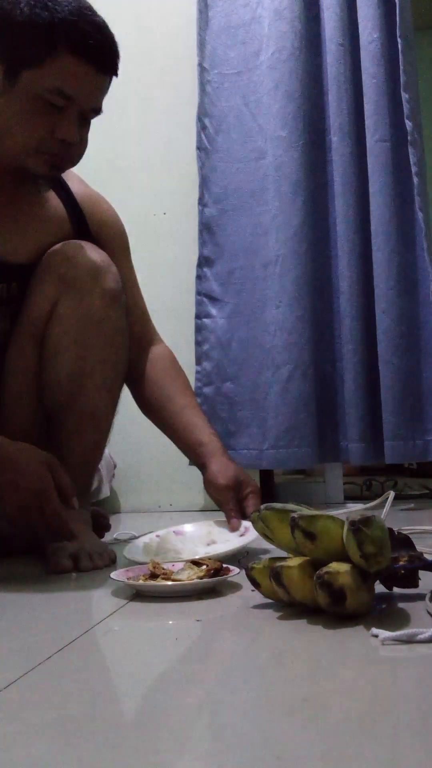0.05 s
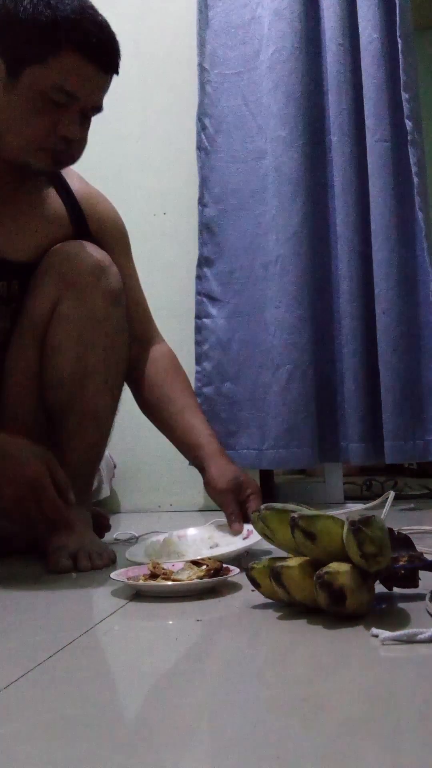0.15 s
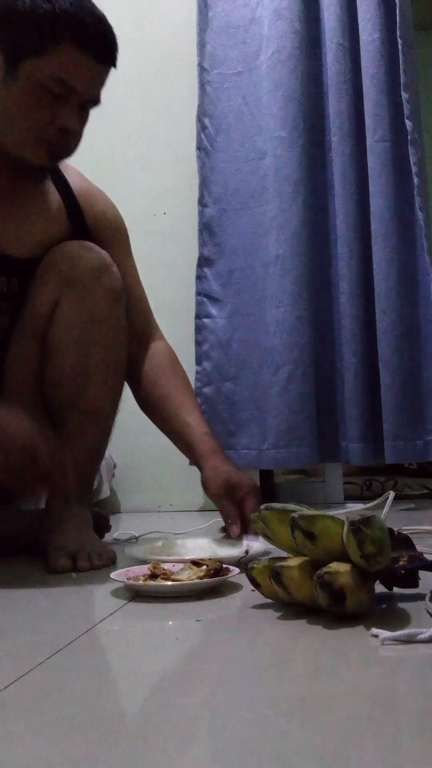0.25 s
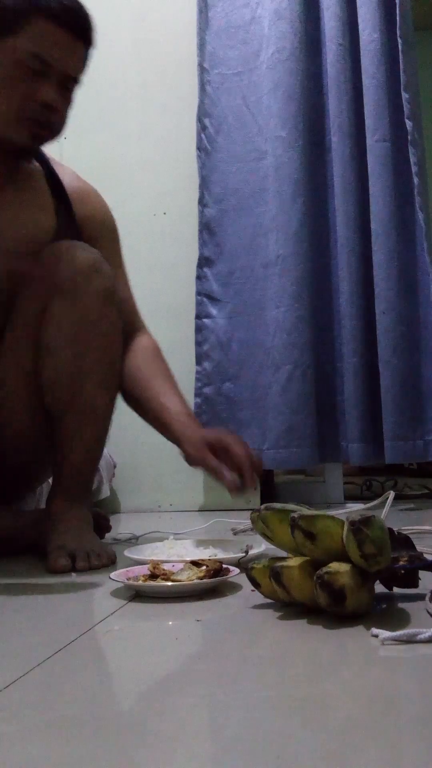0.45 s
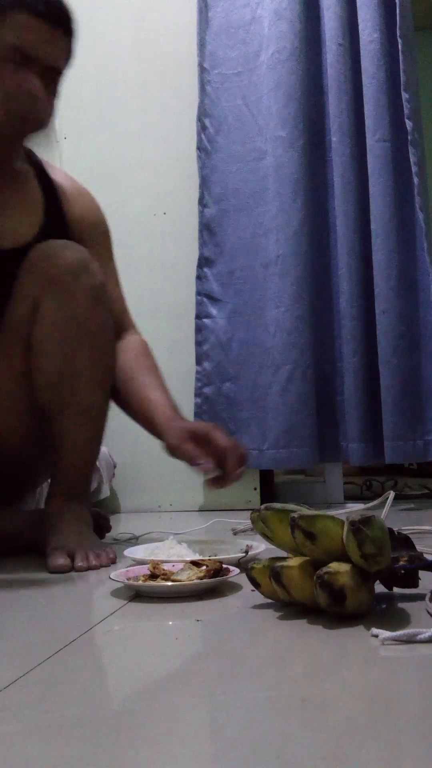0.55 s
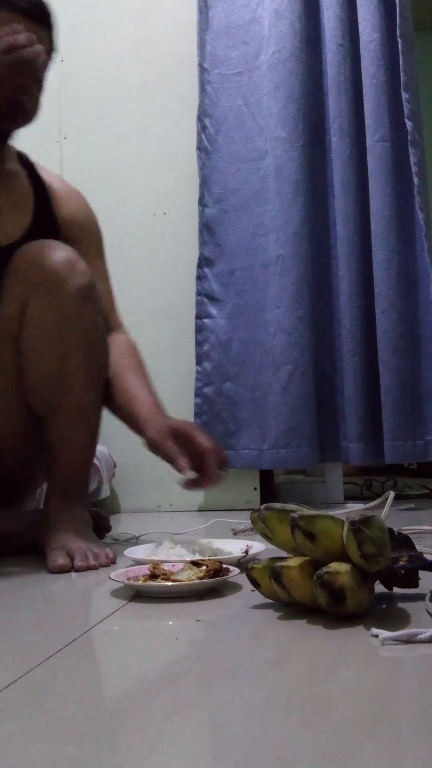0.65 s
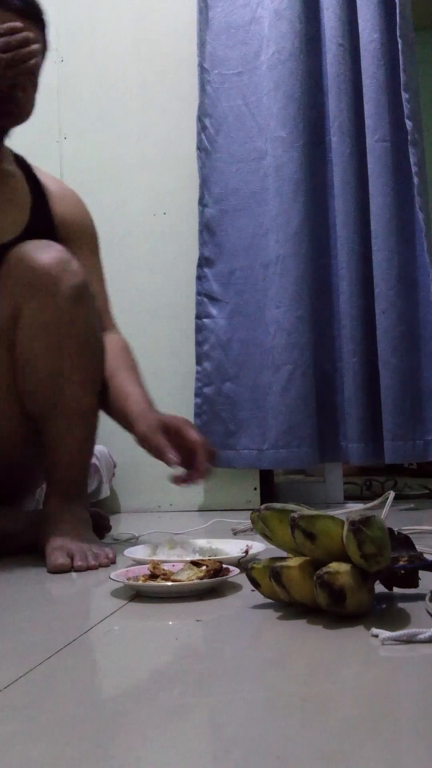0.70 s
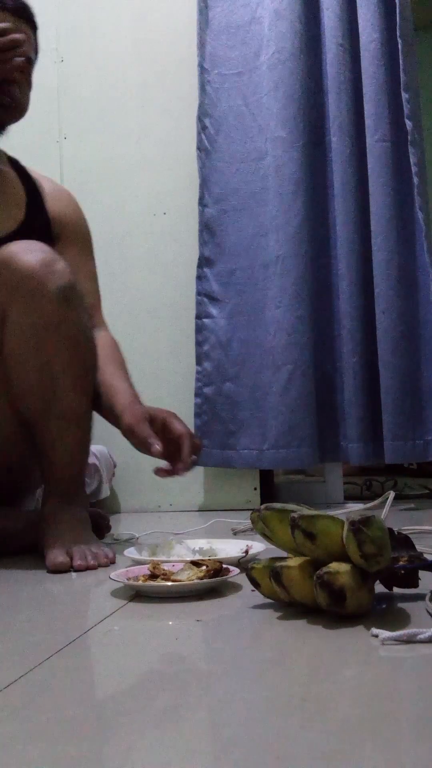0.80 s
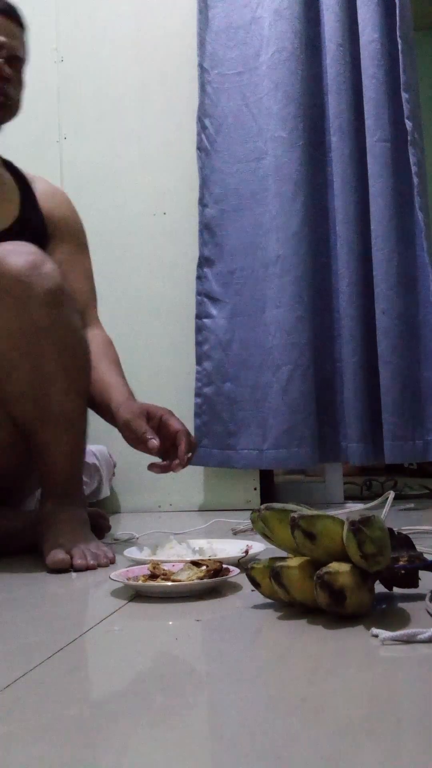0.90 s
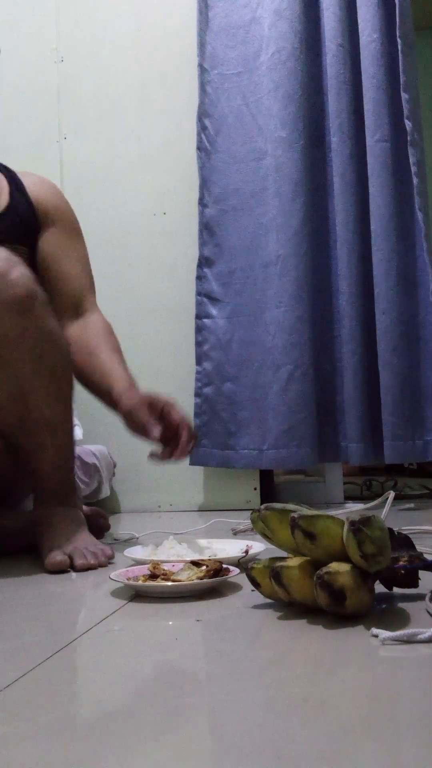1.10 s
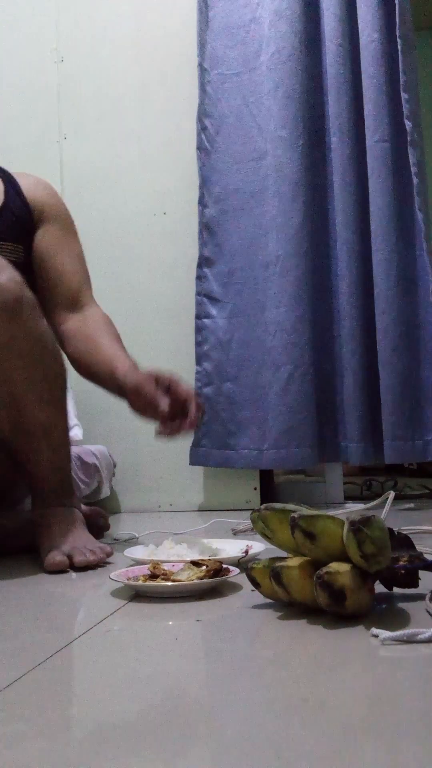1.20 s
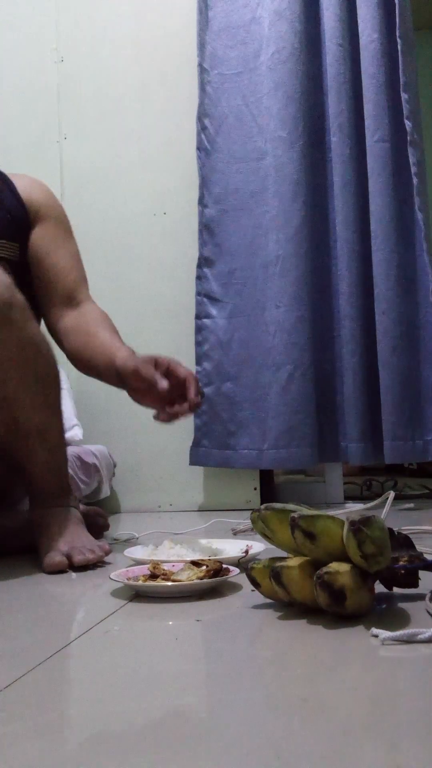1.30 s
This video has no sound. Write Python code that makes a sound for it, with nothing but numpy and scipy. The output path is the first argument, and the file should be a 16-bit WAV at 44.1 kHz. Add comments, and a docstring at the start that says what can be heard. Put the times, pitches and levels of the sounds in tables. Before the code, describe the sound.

A ceramic plate is set down on a tiled floor. A faint ring fades into a soft scrape, then at about 0.2 seconds the plate clinks against another dish, chatters quickly and lands flat at around 0.4 seconds. Soft low thumps and a brief low drone follow from 0.6 seconds, with a faint rustle from 1 second. A low electrical hum runs throughout in the small, quiet room.

```python
"""A faint ceramic ring dies away, then the rims scrape softly as a plate is lowered past a second dish.
The plate clinks against the dish, chatters on its foot ring and lands flat on a tiled floor. Each impact
is a burst of noise, and those of the clink and chatter excite damped modes of both pieces. The hard
walls of the small, quiet room answer; mains hum, room noise, soft thumps, a low drone and a rustle
lie beneath."""
import sys
import numpy as np
from scipy import signal
from scipy.fft import rfft, irfft, next_fast_len
from scipy.io import wavfile
from scipy.ndimage import map_coordinates

SR = 44100
rng = np.random.default_rng(int(sys.argv[2]) if len(sys.argv) > 2 else 0)


def generate_wav(sig):
    """Save sig (samples, or channels by samples) to the path in sys.argv[1] as 16-bit PCM at SR."""
    pcm = np.round(np.clip(np.atleast_2d(sig).T, -1, 1) * 32767).astype(np.int16)
    wavfile.write(sys.argv[1], SR, pcm)


N = 59535
TIME = np.arange(N) / SR


def amp(db):
    """Decibels to amplitude ratio."""
    return 10 ** (np.asarray(db) / 20)


def unit(x):
    """Normalisation to rms 1."""
    return x / np.sqrt(np.mean(x ** 2) + 1e-20)


def along(points, hz):
    """Interpolation of (Hz, value) points on a logarithmic frequency axis."""
    f, v = np.transpose(points)
    return np.interp(np.log(hz + 1), np.log(f + 1), v)


def filtered(x, response):
    """Linear filtering: the spectrum of x times a frequency response."""
    m = next_fast_len(N + SR // 2)
    return irfft(rfft(x, m) * response(np.fft.rfftfreq(m, 1 / SR)), m)[:N]


def noise(spectrum):
    """Spectral shaping: white noise takes on a colour, at rms 1."""
    return unit(filtered(rng.standard_normal(N), lambda hz: amp(along(spectrum, hz))))


def fade(t, t60):
    """Exponential damping: 60 dB lost in t60 seconds."""
    return np.exp(-np.log(1000) * t / np.maximum(t60, 1e-3))


def struck(rise_s, t60, t=TIME):
    """Impact envelope: quick rise, exponential decay."""
    return (1 - np.exp(-t / rise_s)) * fade(t, t60)


def at(s, x):
    """A delay of s seconds."""
    return np.pad(x, (max(round(s * SR), 0), 0))[:N]


def wobble(knots_per_s):
    """Random modulation: a smooth curve through random knots."""
    return map_coordinates(rng.standard_normal(256), [TIME * knots_per_s], mode="wrap")


def gains(rows):
    """Amplitude envelopes, one per dB column after the time; silent after the last row."""
    s, *columns = np.transpose(rows)
    return [amp(np.interp(TIME, s, db, right=-120)) for db in columns]


# Partials of the hum. Each row: frequency in Hz, rms level in dB.
HUM_PARTIALS = [(58.8, -60.5), (118.4, -61), (177, -64), (237, -67.5), (296, -73.5), (1464, -71)]
# Room noise. Each row: frequency in Hz, relative spectral density in dB.
AIR_SPECTRUM = [(15, -63), (25, -33), (50, -17.5), (80, -30), (105, -7), (150, -7), (205, -18),
                (330, -11.5), (390, -20), (450, -12), (650, -17.5), (1250, -18.5), (1650, -26.5),
                (2200, -22), (3100, -36), (4300, -36.5), (6500, -44.5), (8500, -58), (12000, -65.5),
                (16000, -51)]

def background():
    """Superposition: steady partials of mains hum over broadband room noise."""
    hum = sum(amp(db) * np.sqrt(2) * np.sin(2 * np.pi * (hz * TIME + rng.random()))
              for hz, db in HUM_PARTIALS)
    return hum + amp(-55.5) * noise(AIR_SPECTRUM)


# Course of the rustle. Each row: time in seconds, level in dB.
RUSTLE_LEVELS = [(.98, -69.5), (1.05, -55), (1.11, -55), (1.16, -61), (1.27, -57.5), (1.35, -60)]
# Its colour. Each row: frequency in Hz, relative spectral density in dB.
RUSTLE_SPECTRUM = [(120, -5), (220, -15), (310, -3), (380, -6), (450, 0), (560, -6), (1100, -15),
                   (1700, -33), (6000, -48), (12000, -84)]

def rustle():
    """Friction noise, dull and faint, as the hand draws back."""
    level, = gains(RUSTLE_LEVELS)
    return level * noise(RUSTLE_SPECTRUM)


# Course of the drone. Each row: time in seconds, level in dB.
DRONE_LEVELS = [(.6, -82), (.66, -52), (.72, -46.5), (.79, -54), (.87, -48), (1.01, -51), (1.08, -59)]

def drone(hz=97.5):
    """Beating: a low tone lingers after the strongest thump and interferes with the hum."""
    level, = gains(DRONE_LEVELS)
    return level * np.sin(2 * np.pi * hz * TIME)


# Soft thumps. Each row: start in seconds, pitch in Hz, level in dB, rise and t60 in seconds.
LOW_THUMPS = [(0.144, 143, -44.5, 0.028, .12), (.268, 124, -46, 0.021, 0.12),
              (0.577, 119, -37, 0.024, 0.084), (0.602, 105, -34.5, 0.019, .14),
              (0.716, 115, -40, 0.019, .1), (1.034, 146, -44.5, 0.018, 0.16),
              (1.236, 113.6, -44.5, .02, 0.27)]

def thumps():
    """Damped oscillation: each low tone swells and booms briefly."""
    out = np.zeros(N)
    for start, hz, db, rise, t60 in LOW_THUMPS:
        swell = np.sin(np.pi / 2 * np.minimum(TIME / rise, 1)) ** 2
        decay = fade(np.maximum(TIME - rise, 0), t60)
        out += at(start, amp(db) * swell * decay * np.sin(2 * np.pi * hz * TIME))
    return out


# The opening ring. Each row: time in seconds, level of the hiss in dB, level of the modes in dB.
OPENING_LEVELS = [(0, -55.5, -51), (0.049, -58, -61.5), (.1, -63.5, -66), (.145, -53.5, -61),
                  (.21, -55.5, -62), (.24, -71, -61)]
# Its hiss. Each row: frequency in Hz, relative spectral density in dB.
OPENING_SPECTRUM = [(400, -8), (700, -8), (1300, 0.5), (1700, -9), (2050, -4), (2270, 2.5), (2900, -10.5),
                    (3500, 1.5), (4000, -10.5), (4550, -8), (5200, -11), (6800, -10.5), (8500, -35),
                    (13000, -46), (15000, -26)]
# Its modes. Each row: frequency in Hz, relative level in dB.
OPENING_MODES = [(1345, -7.5), (2145, -1), (2277, 2.5), (3560, -13.5), (4570, -10)]

def opening_ring(wavers_per_s=31):
    """Modal decay: faint, wavering ceramic tones and a hiss fade, then lift a little with the scrape."""
    hiss_level, tone_level = gains(OPENING_LEVELS)
    tones = np.zeros(N)
    for hz, db in OPENING_MODES:
        waver = wobble(wavers_per_s) + 1j * wobble(wavers_per_s)
        tones += amp(db) * np.real(waver * np.exp(2j * np.pi * hz * TIME))
    return hiss_level * noise(OPENING_SPECTRUM) + tone_level * unit(tones)


# Course of the slip. Each row: time in seconds, level in dB.
SLIP_LEVELS = [(.095, -84), (.125, -63), (.155, -56.5), (.2, -61), (.22, -80)]
# Its colour. Each row: frequency in Hz, relative spectral density in dB.
SLIP_SPECTRUM = [(1000, -29), (2050, -5), (2270, 2), (2500, -1), (2750, 4), (3050, -9), (3500, -2.5),
                 (4000, -6), (4570, 4), (5100, -14.5), (5800, 0), (7000, -12), (8300, -21), (10000, -26),
                 (13000, -37), (15000, -31)]

def slip():
    """Sliding friction: a short, bright scrape of the rim just before the clink."""
    level, = gains(SLIP_LEVELS)
    return level * noise(SLIP_SPECTRUM)


# Reverberation times of the room. Each row: frequency in Hz, t60 in seconds.
ROOM_DECAY = [(200, 0.16), (1000, 0.14), (3000, 0.16), (6000, 0.17), (9000, 0.1), (14000, 0.11)]

def walls(x, delay_s=0.008):
    """Reverberation: convolution with a diffuse tail that dies fastest in the high treble."""
    hz, t, spectra = signal.stft(rng.standard_normal(SR // 2), SR, nperseg=256)
    damping = fade(t, along(ROOM_DECAY, hz)[:, None])
    _, tail = signal.istft(spectra * damping, SR, nperseg=256)
    return at(delay_s, signal.fftconvolve(x, tail / np.linalg.norm(tail)))


# The plate landing flat. Each row: start in seconds, level in dB.
LANDING_KNOCKS = [(0.41, -28), (0.4239, -28), (0.4282, -25)]
# One knock. Each row: frequency in Hz, relative spectral density in dB.
KNOCK_SPECTRUM = [(100, -35), (240, -21.5), (335, -1.5), (400, -0.5), (460, 3), (520, -10), (600, 4),
                  (700, 7), (820, -18), (1000, 4.5), (1600, -21), (4000, -46)]

def landing():
    """Impact noise: the full weight of the plate knocks on the tiles, and the walls reflect it."""
    envelope = struck(rise_s=0.00082, t60=0.059)
    knocks = sum(at(start, amp(db) * noise(KNOCK_SPECTRUM) * envelope) for start, db in LANDING_KNOCKS)
    return knocks + amp(-8.5) * walls(knocks)


# Modes of the dish, of the plate, and of the plate standing hollow on its foot.
# Each row: frequency in Hz, relative level in dB, t60 in seconds.
DISH_MODES = [(2075, -7, .14), (2199, -6, .22), (2579, -3, .27), (3300, -15, .14), (3410, -14, .15),
              (4527, -14, .22), (5712, -17, .24), (6250, -19, .2)]
PLATE_MODES = [(942, -14, .14), (987, -11, .18), (1201, -12, .14), (1262, -2, .2), (1332, -4, .18),
               (1395, -14, .14), (1868, -11, .15), (1932, -14, .16), (2083, -6, .14), (2138, -11, .14),
               (2245, -11, .16), (2513, -11, .18), (2639, -12, .18), (3826, -14, .16), (3985, -16, .2),
               (4143, -19, .17), (4400, -15, .16), (4480, -17, .19), (5605, -17, .25), (5700, -18, .24),
               (6880, -26, .2), (7484, -22, .21), (7560, -26, .22), (7640, -28, .2), (8400, -36, .15),
               (9370, -37, .17)]
FOOT_MODES = [(648.4, -0.5, 0.16), (1027, -1, 0.096), (1108, 3.5, 0.14), (1326, 1.5, 0.14)]

def ring(modes, scatter_db=1, waver_rad=0.42, wavers_per_s=110):
    """Free vibration: modes vary in strength with the contact point and in phase as the plate rocks."""
    t = TIME[:SR // 3]
    out = np.zeros(N)
    for hz, db, t60 in modes:
        waver = map_coordinates(rng.standard_normal(128), [t * wavers_per_s], order=1, mode="wrap")
        strength = amp(db + scatter_db * rng.standard_normal())
        envelope = struck(rise_s=0.00097, t60=t60, t=t)
        out[:len(t)] += strength * np.sin(2 * np.pi * hz * t + waver_rad * waver) * envelope
    return out


# The sharp tick and the clack of a contact. Each row: frequency in Hz, relative spectral density in dB.
TICK_SPECTRUM = [(1000, -24.5), (3000, 0.5), (6300, 3.5), (8500, -11.5), (11000, -23.5), (13500, -33),
                 (15000, -22), (16000, -31)]
CLACK_SPECTRUM = [(200, -24), (330, -11), (500, -13), (800, -5), (1000, -0.5), (1400, 6), (1750, 0.5),
                  (2300, 5.5), (2900, -4.5), (3300, 1), (3650, -4.5), (4400, 0.5), (5250, -15), (5800, -2),
                  (6550, -19.5), (6900, -7), (7250, -21), (8200, -27.5), (10500, -37), (13500, -53),
                  (14800, -34), (16000, -53)]
# Contacts. Each row: start in seconds, then gains in dB of clack, dish, plate, foot and tick.
PLATE_CONTACTS = [ (0.2162, -29, -22.5, -42, -60, -26), (0.2277, -24.5, -34.5, -47, -32.5, -55),
                  (.2325, -24, -32.5, -45, -41.5, -50), (0.2917, -28, -27, -47, -50, -33),
                  (0.3053, -16.5, -26.5, -25, -38.5, -35), (0.3136, -21, -33, -25.5, -42, -25.5),
                  (0.3227, -18, -39.5, -25.5, -41.5, -40), (0.3277, -22, -36.5, -26.5, -46, -31),
                  (.3405, -26, -36, -29.5, -42, -33.5), (.3535, -28.5, -40.5, -24, -43.5, -38),
                  (0.364, -21, -39, -27.5, -47, -26.5), (0.3718, -17.5, -32.5, -23.5, -38.5, -43),
                  (0.3828, -22, -38, -26, -43, -48), (0.3967, -29, -34.5, -27, -46.5, -52),
                  (0.4109, -18.5, -38, -35, -38.5, -19), (0.4242, -19.5, -40.5, -31.5, -40, -25.5),
                  (0.4283, -20, -34, -34.5, -41, -38), (0.4418, -28, -37, -38, -51, -31.5)]

def plate():
    """Impulsive excitation: each contact ticks, clacks and rings plate and dish; the walls answer."""
    out = np.zeros(N)
    for start, clack_db, dish_db, plate_db, foot_db, tick_db in PLATE_CONTACTS:
        tick = amp(tick_db) * noise(TICK_SPECTRUM) * struck(rise_s=0.0004, t60=0.02)
        clack = amp(clack_db) * noise(CLACK_SPECTRUM) * struck(rise_s=0.0015, t60=0.051)
        rings = amp(dish_db) * ring(DISH_MODES)
        rings += amp(plate_db) * ring(PLATE_MODES)
        rings += amp(foot_db) * ring(FOOT_MODES)
        reverb = walls(amp(-4.5) * (tick + clack) + amp(-5.5) * rings)
        out += at(start, tick + clack + rings + reverb)
    return out


def scene():
    """Superposition: the pressures of all sources add at one point."""
    ceramic = plate() + landing() + opening_ring() + slip()
    return (ceramic + thumps() + drone() + rustle() + background())[None]


def record(dry, top_hz=15900):
    """Band limiting: an ideal low-pass filter removes the highest treble."""
    return np.array([filtered(x, lambda hz: hz < top_hz) for x in dry])


dry = scene()
out = record(dry)
generate_wav(out)
```